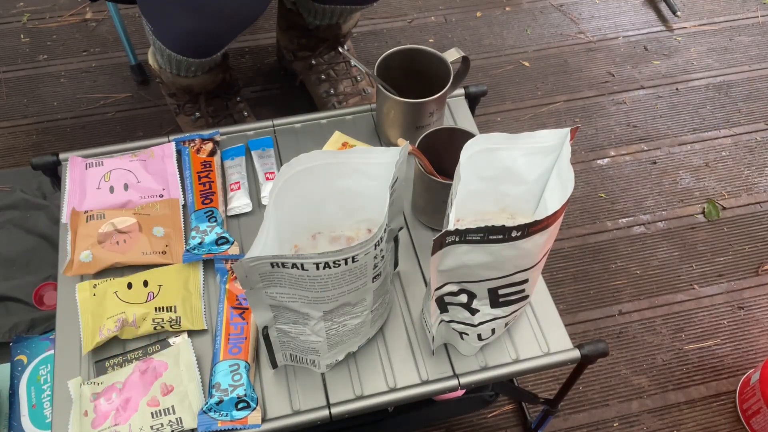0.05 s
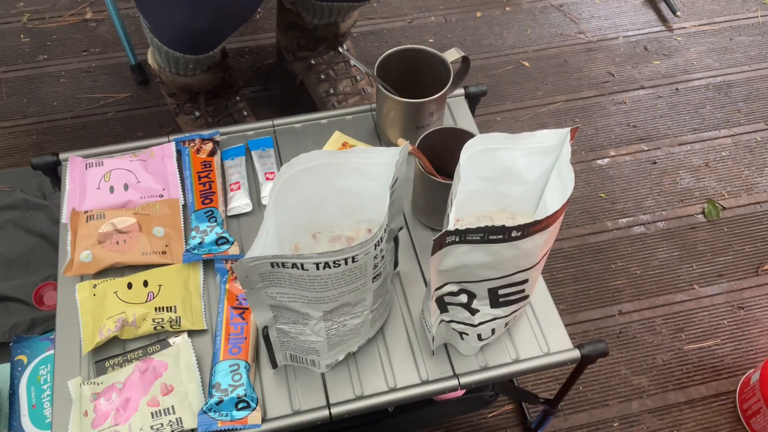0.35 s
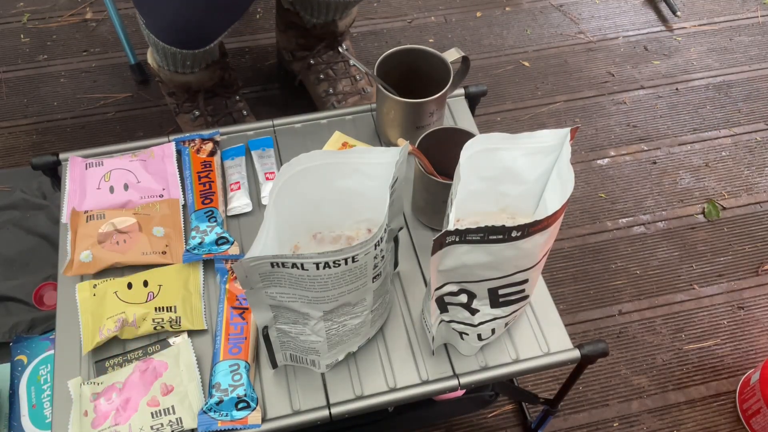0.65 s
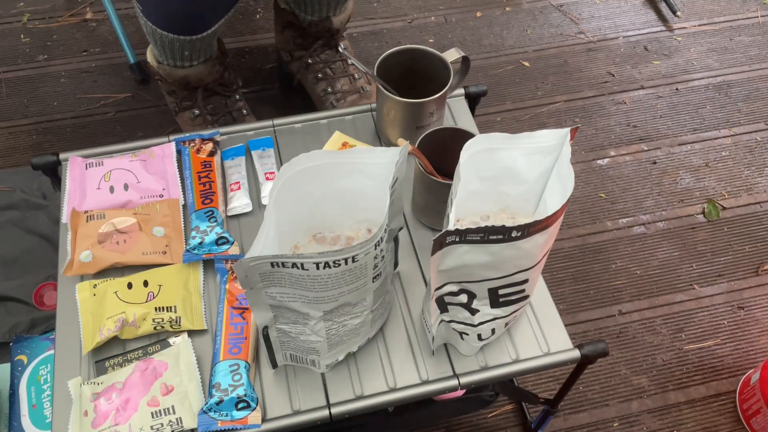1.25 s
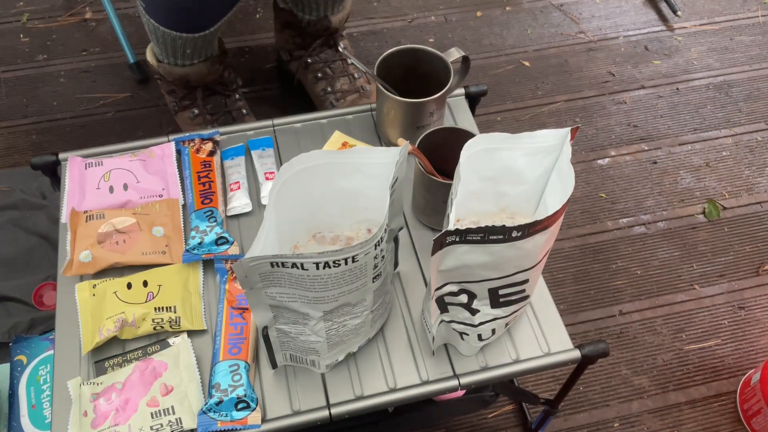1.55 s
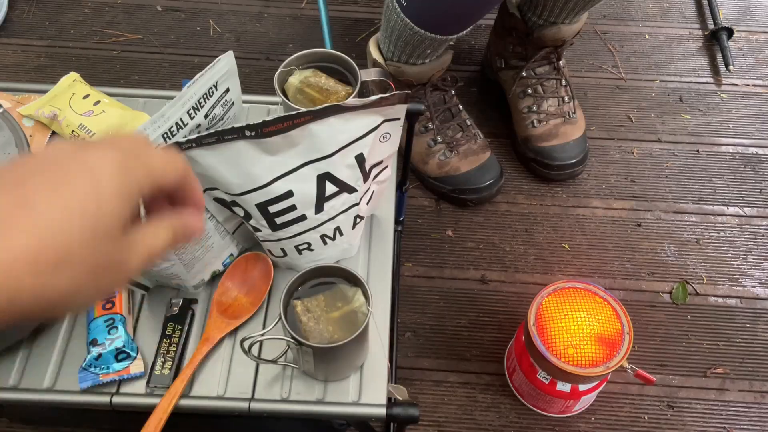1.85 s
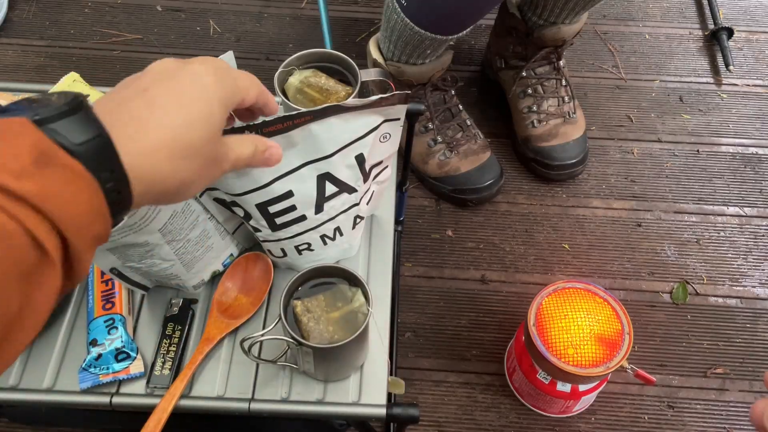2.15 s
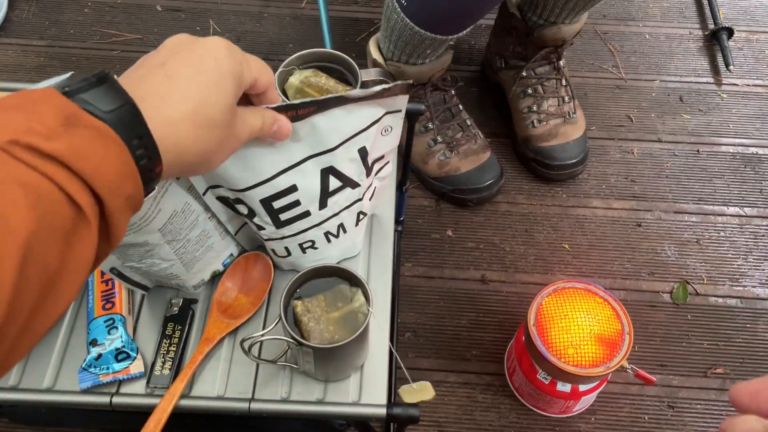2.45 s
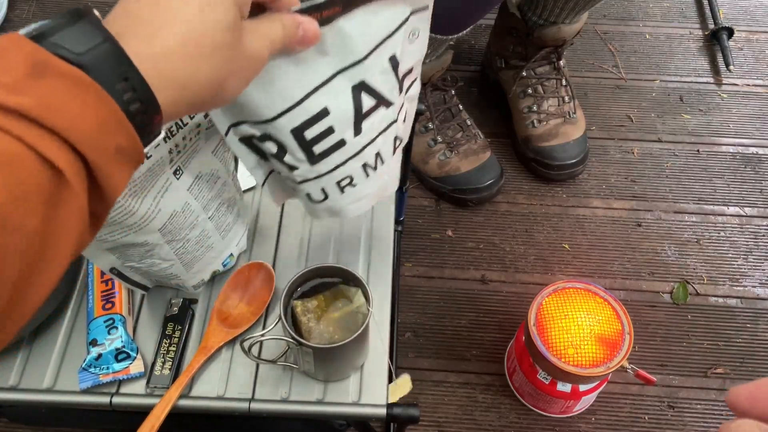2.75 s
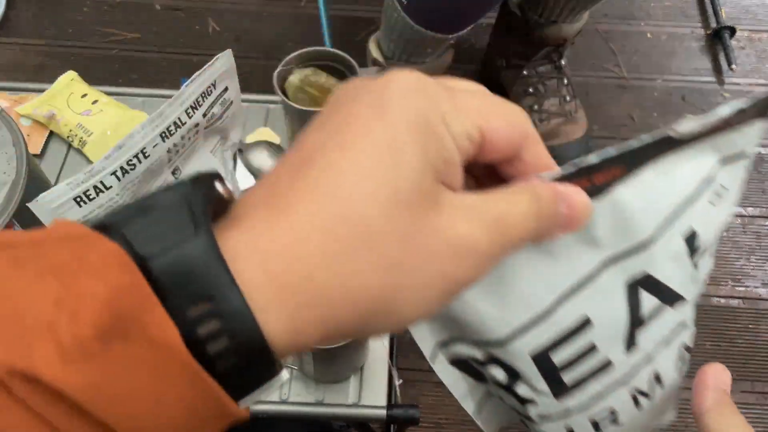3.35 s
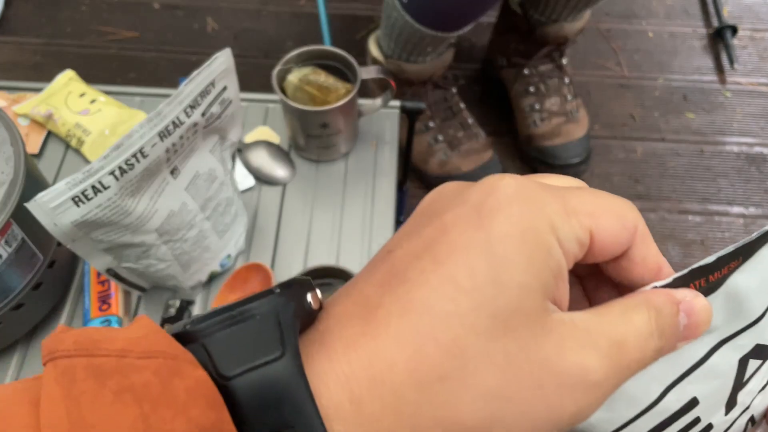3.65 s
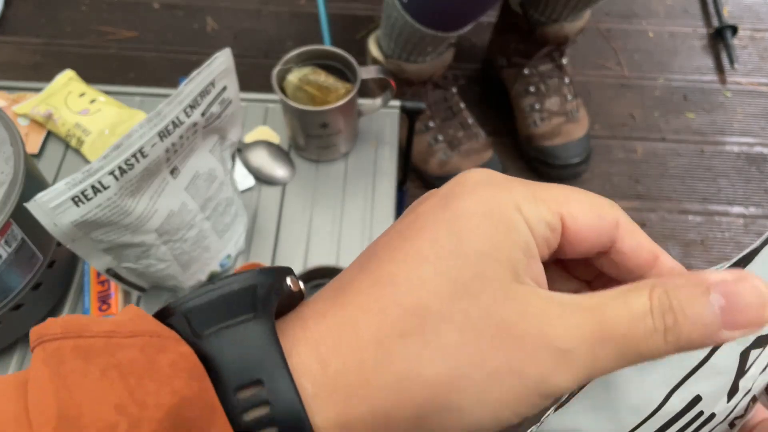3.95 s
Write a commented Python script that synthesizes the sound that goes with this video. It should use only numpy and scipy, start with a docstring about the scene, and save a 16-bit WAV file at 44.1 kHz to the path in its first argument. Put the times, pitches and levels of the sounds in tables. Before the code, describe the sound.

A foil pouch is handled close to the microphone on a wet outdoor deck. Drips tick on packets in steady rain, a jacket sleeve swishes, then the lifted pouch bumps the table items and gives small pops and crinkles.

```python
"""A foil food pouch knocks against the table things as it is lifted, then pops and crinkles as its thin
walls flex in the hand. A nylon jacket sleeve swishes with the reach. Steady rain hisses around the
wet camp deck over a low rumble, and a few drips tick on the packets on the table.
The whole sound drops out for a moment before the lift."""
import sys
import numpy as np
from scipy import signal
from scipy.fft import rfft, irfft
from scipy.io import wavfile

SR = 44100
rng = np.random.default_rng(int(sys.argv[2]) if len(sys.argv) > 2 else 0)


def inscribe(sig):
    """Save sig as 16-bit PCM at rate SR to the path in sys.argv[1].

    A 1-D sig is mono; a 2-D sig holds one channel per row.
    Samples are clipped to [-1, 1] before scaling.
    """
    pcm = np.round(np.clip(np.atleast_2d(sig).T, -1, 1) * 32767)
    wavfile.write(sys.argv[1], SR, pcm.astype(np.int16))


N = 176400
TIME, FREQS = np.arange(N) / SR, np.maximum(np.arange(N // 2 + 1) * SR / N, 1)

# stereo image, high values narrow and low ones wide: f/Hz, left-right likeness (clipped in use)
STEREO_LIKENESS = [(60, 1), (110, 1.1), (190, 0.74), (260, 0.66), (350, 0), (820, -0.27), (1470, -0.22),
                   (2000, 0.26), (2620, 0.49), (4700, 0.37), (6400, .5), (7400, -0.13), (7750, -1.98),
                   (8600, -1.41), (9200, 0), (10000, 0), (11200, 1), (13500, 1.8), (15500, -0.7)]
# lean of the image: f/Hz, left over right/dB
STEREO_BALANCE = [(100, 0), (400, 1.8), (1100, 0.1), (2200, 1.1), (5200, 3.5), (7800, 2), (15000, -1)]

# colour of the outdoor rumble: f/Hz, relative level/dB
RUMBLE_TONE = [(16, -40), (28, -44), (45, -7), (64, -0.5), (90, -4.5), (130, -7), (200, -15), (400, -32.5),
               (1000, -73)]
# its slow swell: t/s, level/dB
RUMBLE_SWELL = [(0, -45), (.6, -45), (1, -43.5), (1.7, -44.5), (2.1, -43.5), (2.55, -44), (2.9, -44),
                (3.2, -44.5), (4, -45)]
# soft low bumps within it: t/s, level/dB, f/Hz
RUMBLE_BUMPS = [(2.123, -36.5, 82), (2.337, -31.5, 68), (3.377, -36.5, 84)]

# colour of the far wash of rain: f/Hz, relative level/dB
WASH_TONE = [(120, -3.5), (220, -1.5), (350, -1), (500, 0.5), (750, -1.54), (1200, -5), (2100, -10.5),
             (3000, -15.5), (4200, -21), (5600, -24), (7000, -29.5), (9500, -34), (10500, -36),
             (13500, -37), (15800, -41)]
# colour of the nearer drops: f/Hz, relative level/dB
PATTER_TONE = [(300, -13), (900, -8), (2200, 6), (4500, -8.5), (7000, -13), (15000, -46)]
WASH_DB, PATTER_DB, HOLLOW_DB = -44.5, -59, -66.5

# colour of rubbing nylon: f/Hz, relative level/dB
SLEEVE_TONE = [(600, -8), (2000, 8), (5000, 1.5), (6800, -1), (8200, -1), (10500, -2.5), (12500, -8),
               (15800, -39)]
# swishes of the moving arm: t/s, level/dB
SLEEVE_SWELL = [(0, -84), (.27, -59), (.5, -68), (.95, -79), (1.3, -67), (1.43, -56.5), (1.6, -62.5),
                (1.74, -57.5), (1.88, -48.5), (2.15, -53.5), (2.45, -57), (2.85, -61), (3.08, -51),
                (3.22, -55.5), (3.38, -55), (3.66, -56.5), (3.74, -52.5), (3.83, -58), (4, -54.5)]

# drips and ticks on the packets: t/s, level/dB, tilt/(dB per octave), low edge/Hz
TICK_HITS = [(0.167, -51, -3, 3000), (.206, -48, -2.5, 2000), (.255, -42, -3, 1200), (0.34, -36.5, -1, 300),
             (0.345, -36, -3.5, 300), (0.58, -46.5, -2.5, 1400), (1.137, -59, 8, 3000),
             (2.3481, -37.5, -1.5, 2400), (3.537, -44, -5, 3000), (3.745, -43, -1.5, 1400)]
# colour of a tick before its tilt and low cut: f/Hz, relative level/dB
TICK_TONE = [(300, 6), (900, 15.5), (1600, 5.5), (2400, -4), (3200, 1.5), (4300, 0), (5200, -7),
             (7000, -2.5), (9000, -4.5), (11000, -10.5), (15500, -16)]

# the pouch hits the table things: t/s, strike level/dB, contact cut-off/Hz, pitch ratio
KNOCK_HITS = [(2.5755, -32.5, 2900, 1.03), (2.627, -27, 3900, 1), (2.6306, -30, 2000, .99),
              (2.6514, -30, 1050, 1.01), (2.6581, -26.5, 480, .99), (2.6867, -35, 1700, 1.04),
              (2.6968, -30, 450, 1)]
# modes that a knock sets ringing: f/Hz, relative level/dB, t60/s
KNOCK_MODES = [(280, -17.5, 0.13), (497, -6, 0.099), (770, -7.5, 0.022), (998, -5, 0.035),
               (1157, -5.5, 0.028), (1310, -3, 0.03), (1650, -5.5, 0.012), (2130, -6, 0.016),
               (2735, -12, 0.032), (3760, -11, .022), (4070, -14, 0.026)]
# colour of the crack of a hard contact: f/Hz, relative level/dB
CRACK_TONE = [(500, -1), (1400, 5.5), (4500, -0.5), (7000, -5), (10500, -4.5), (15000, -22)]
CRACK_RELATIVE_DB, CRACK_T60_S = -8.5, 0.036

# a packet wall rings as a drip taps it or as it buckles, one row a partial: t/s, level/dB, f/Hz, t60/s
WALL_PARTIALS = [(.3412, -37, 623, .028), (.343, -34, 1080, 0.016), (2.3486, -43, 2360, .02),
                 (2.3481, -37, 4610, 0.015), (2.3486, -45, 5710, .013), (2.3484, -51, 7240, .013),
                 (2.3484, -42, 10600, 0.013), (3.525, -30, 1110, 0.029), (3.526, -30, 2420, 0.0027),
                 (3.526, -34.5, 650, 0.02), (3.597, -30.5, 2260, 0.0082), (3.598, -32, 1430, .013),
                 (3.5985, -34, 960, 0.025), (3.6007, -22.5, 266, 0.018), (3.748, -29, 1830, 0.0053)]
# colour of foil crumpling under the fingers: f/Hz, relative level/dB
CRUMPLE_TONE = [(500, -26), (1500, 4.5), (2300, -1), (4200, -0.5), (5500, -11), (15000, -27)]
CRUMPLE_S, CRUMPLE_WIDTH_S, CRUMPLE_DB = 3.603, 0.015, -43.5
# faint rustle of the carried pouch: t/s, level/dB
CRINKLE_SWELL = [(3, -90), (3.3, -57), (3.6, -64), (3.75, -67), (3.86, -64), (4, -61)]
# its airy colour: f/Hz, relative level/dB
CRINKLE_TONE = [(2000, -15), (5000, 3), (10000, -13), (13000, -3), (15800, -1)]

DROPOUT_S, CUTOFF_HZ = (1.669, 1.717), 15950


def from_db(db):
    """Decibels to gain."""
    return 10 ** (np.asarray(db) / 20)


def rms_one(x):
    """Scale to rms 1."""
    return x / np.sqrt(np.mean(x ** 2) + 1e-20)


def fader(rows):
    """Gain over time from rows of t/s, level/dB."""
    return from_db(np.interp(TIME, *np.transpose(rows)))


def at_hz(points):
    """A curve over all frequencies from rows of f/Hz, value."""
    hz, value = np.transpose(points)
    return np.interp(np.log(FREQS), np.log(hz), value)


def drift(rate_hz):
    """A slow random waver, rms 1."""
    return rms_one(irfft(rfft(rng.standard_normal(N)) / (1 + (FREQS / rate_hz) ** 2), N))


def panned(db):
    """Stereo gains: left up by db, right down by as much."""
    return from_db([[db], [-db]])


def diffuse(tone, pair):
    """Colour two unrelated signals and blend them into a stereo sound from all around, rms 1."""
    mid, side = rfft(pair) * from_db(at_hz(tone))
    alike = np.clip(at_hz(STEREO_LIKENESS), -.99, .95)
    sides = np.array([[1], [-1]])
    stereo = np.sqrt(1 + alike) * mid + np.sqrt(1 - alike) * side * sides
    return rms_one(irfft(stereo * from_db(sides * at_hz(STEREO_BALANCE) / 2), N))


def noise(tone):
    """Smooth diffuse noise."""
    return diffuse(tone, rng.standard_normal((2, N)))


def grains(per_s, spread_db):
    """Two streams of random clicks, mostly small."""
    sizes = from_db(spread_db * np.minimum(rng.exponential(1, (2, N)), 5))
    signs = rng.choice([-1, 1], (2, N))
    return sizes * signs * (rng.random((2, N)) < per_s / SR)


def decay(s, t60):
    """An envelope that jumps to 1 at time s and dies away."""
    return (TIME >= s) * from_db(-60 * np.clip((TIME - s) / t60, 0, 4))


def bell(s, width_s):
    """A bell-shaped envelope that peaks at time s."""
    return np.exp(-.5 * ((TIME - s) / width_s) ** 2)


def click(s):
    """A unit click at time s."""
    return 1. * (np.arange(N) == int(s * SR))


def ring(drive, hz, t60):
    """A resonator: a unit click sets a sine of height 1 ringing."""
    radius, angle = from_db(-60 / (t60 * SR)), 2 * np.pi * hz / SR
    return signal.lfilter([0, np.sin(angle)], [1, -2 * radius * np.cos(angle), radius ** 2], drive + 1e-18)


def scattered(x, wet):
    """Add a short spray of reflections off the table and deck, different in each ear."""
    tail = (rng.standard_normal((2, N)) * decay(0.0044, t60=0.077))[:, :SR // 4]
    tail /= np.sqrt(np.sum(tail ** 2, axis=1, keepdims=True))
    return x + wet * signal.fftconvolve(x[None], tail, axes=1)[:, :N]


def rumble():
    """A lumpy low bed, nearly the same in both ears, with a few soft bumps."""
    bumps = sum(from_db(db) * bell(s, width_s=0.013) * np.sin(2 * np.pi * hz * (TIME - s))
                for s, db, hz in RUMBLE_BUMPS)
    waver = from_db(0.62 * drift(rate_hz=7.5))
    return fader(RUMBLE_SWELL) * waver * noise(RUMBLE_TONE) + bumps


def rain():
    """Countless far drops merge into a wash with a faint hollow note; nearer ones patter through it."""
    wash = from_db(WASH_DB + 0.64 * drift(rate_hz=4.4)) * noise(WASH_TONE)
    patter = from_db(PATTER_DB) * diffuse(PATTER_TONE, grains(per_s=700, spread_db=3.5))
    hollow = from_db(HOLLOW_DB) * rms_one(ring(rng.standard_normal((2, N)), hz=487, t60=0.16))
    return wash + patter + hollow


def sleeve():
    """Nylon rubs: fine bright friction noise that swells with each move of the arm."""
    return fader(SLEEVE_SWELL) * diffuse(SLEEVE_TONE, grains(per_s=12000, spread_db=2.3))


def packet_ticks():
    """Drips and ticks on foil, each a sharp, short splash of noise; the small ones lack the lows."""
    ticks = 0
    for s, db, tilt_db, edge_hz in TICK_HITS:
        tone = [(hz, band_db + tilt_db * np.log2(hz) - 20 * np.log10(1 + (edge_hz / hz) ** 2))
                for hz, band_db in TICK_TONE]
        ticks = ticks + from_db(db) * decay(s, t60=0.04) * noise(tone)
    return ticks * panned(db=-0.5)


def pouch_knocks():
    """Each knock rings the same modes, slightly retuned; soft contacts thud, hard ones crack."""
    body = 0
    for k, (hz, mode_db, t60) in enumerate(KNOCK_MODES):
        for s, db, cut_hz, pitch in KNOCK_HITS:
            strength = from_db(db + mode_db + rng.normal(0, 1)) / np.hypot(1, (hz / cut_hz) ** 2)
            body = body + (-1) ** k * strength * ring(click(s), hz * pitch, t60)
    hardest_hz = max(cut_hz for _, _, cut_hz, _ in KNOCK_HITS)
    attacks = sum(from_db(db + CRACK_RELATIVE_DB) * (cut_hz / hardest_hz) ** 2 * decay(s, CRACK_T60_S)
                  for s, db, cut_hz, _ in KNOCK_HITS)
    return (scattered(body, wet=0.52) + attacks * noise(CRACK_TONE)) * panned(db=0.5)


def foil_walls():
    """Walls ring briefly as a drip taps them or they buckle; the carried pouch crinkles and crumples."""
    rings = sum(from_db(db) * ring(click(s), hz, t60) for s, db, hz, t60 in WALL_PARTIALS)
    crinkle = fader(CRINKLE_SWELL) * diffuse(CRINKLE_TONE, grains(per_s=16000, spread_db=4))
    squeeze = from_db(CRUMPLE_DB) * bell(CRUMPLE_S, CRUMPLE_WIDTH_S)
    crumple = squeeze * diffuse(CRUMPLE_TONE, grains(per_s=4000, spread_db=2.7))
    return scattered(rings, wet=.28) + crumple + crinkle


def scene():
    """A bed of rumble and rain all around, with the drips and the handling close by."""
    return rumble() + rain() + sleeve() + packet_ticks() + pouch_knocks() + foil_walls()


def record(dry):
    """The sound drops out briefly, and a steep low-pass takes off the very top."""
    gate = (TIME < DROPOUT_S[0]) | (TIME > DROPOUT_S[1])
    low_pass = signal.ellip(12, .1, 80, CUTOFF_HZ, fs=SR, output="sos")
    return signal.sosfilt(low_pass, dry * gate)


dry = scene()
out = record(dry)
inscribe(out)
```